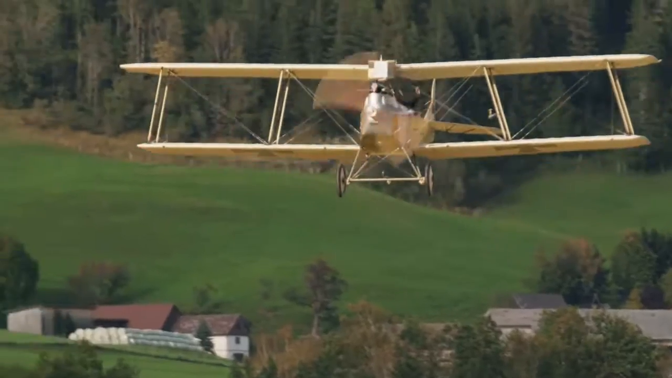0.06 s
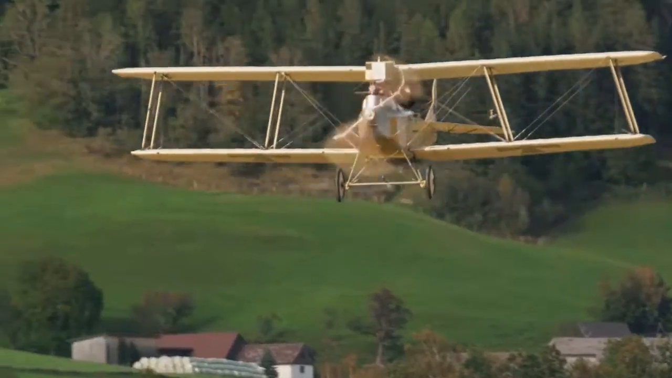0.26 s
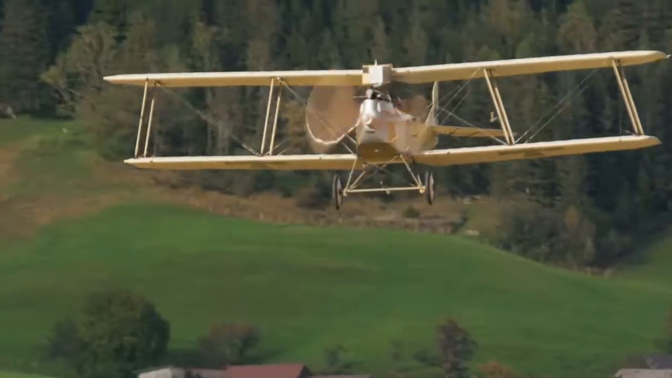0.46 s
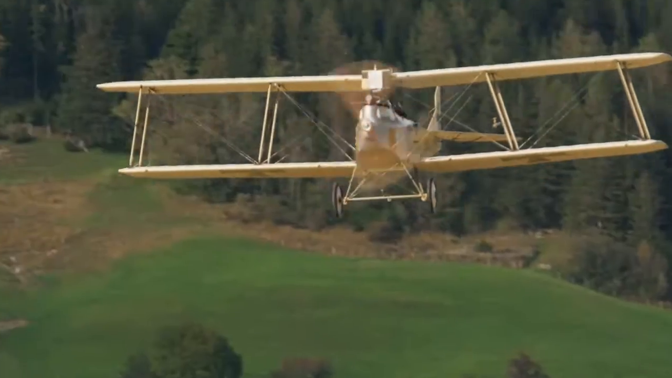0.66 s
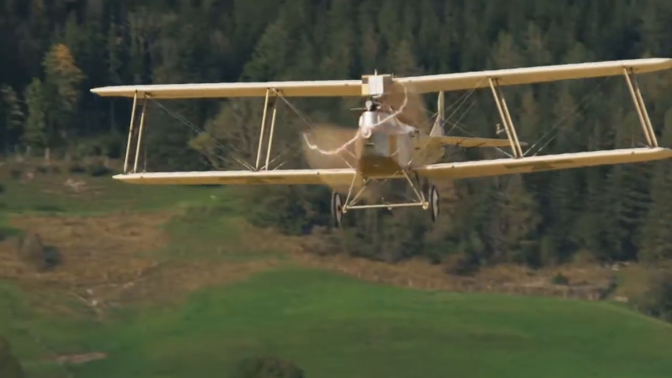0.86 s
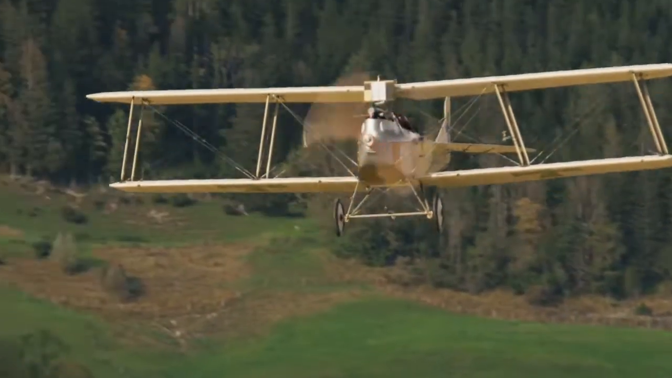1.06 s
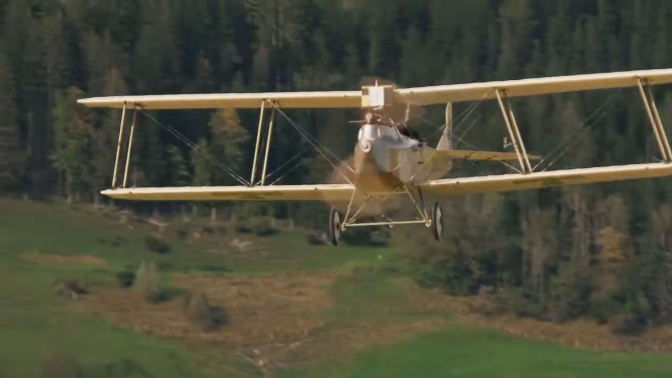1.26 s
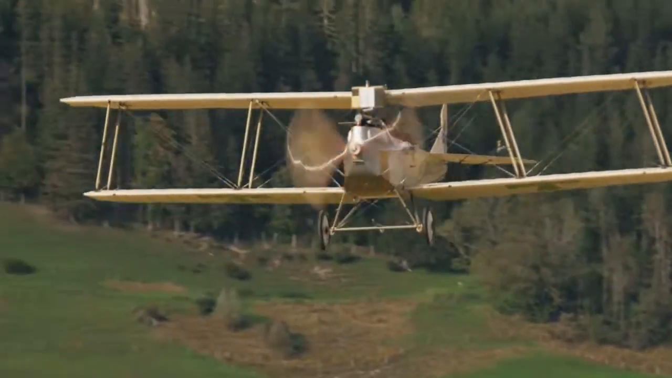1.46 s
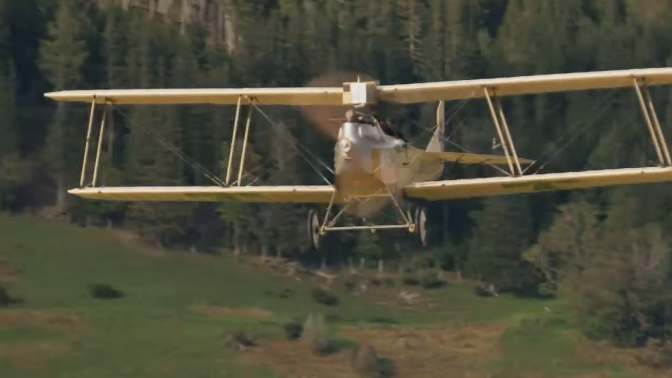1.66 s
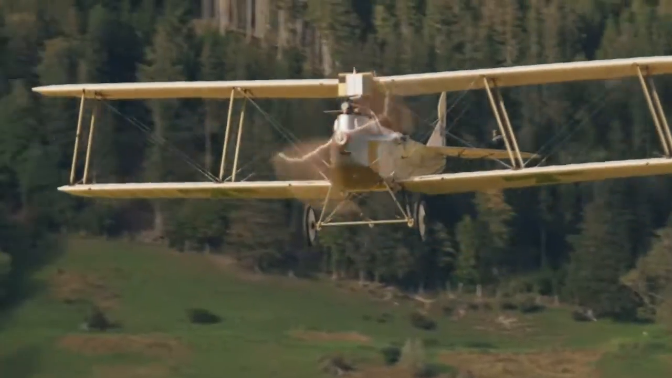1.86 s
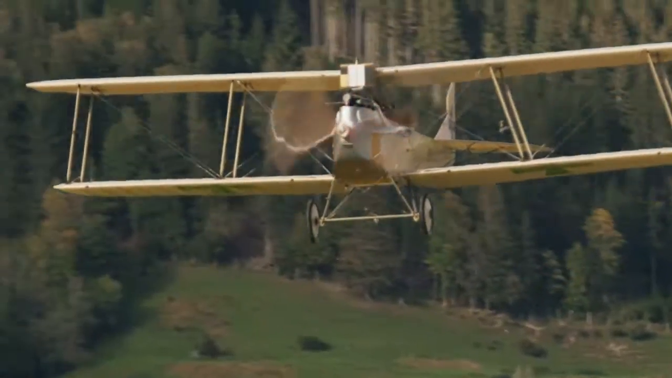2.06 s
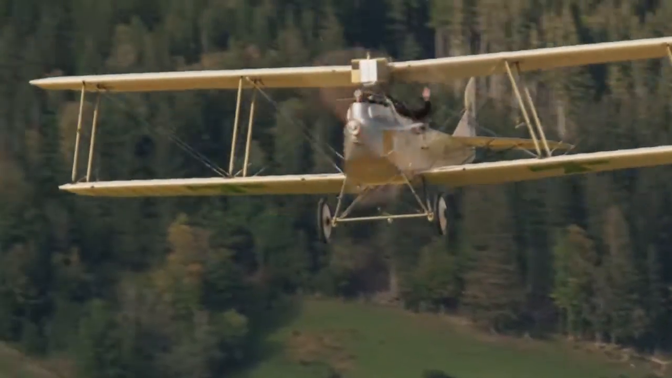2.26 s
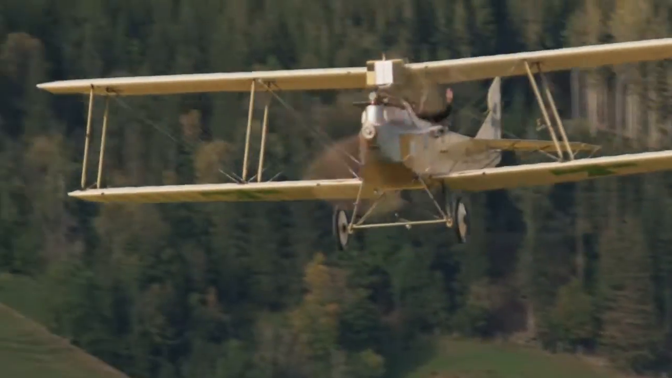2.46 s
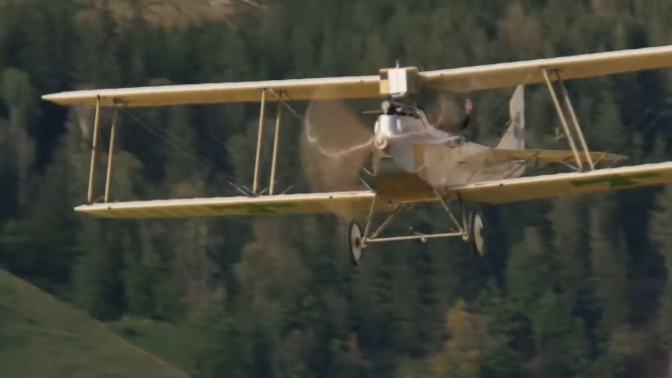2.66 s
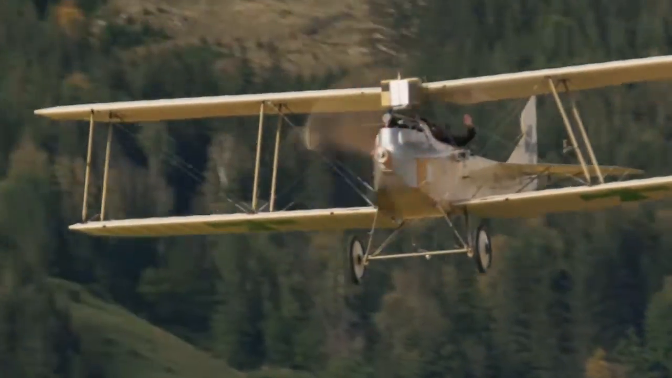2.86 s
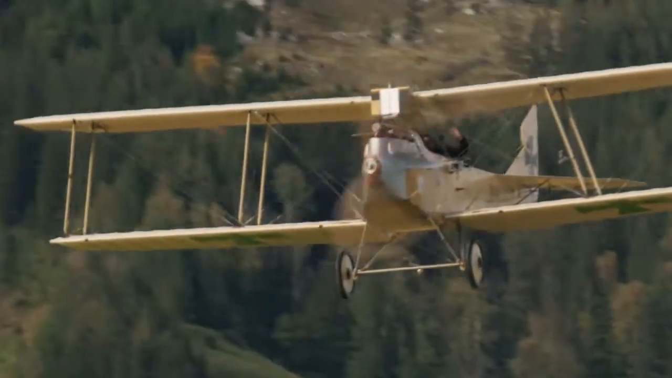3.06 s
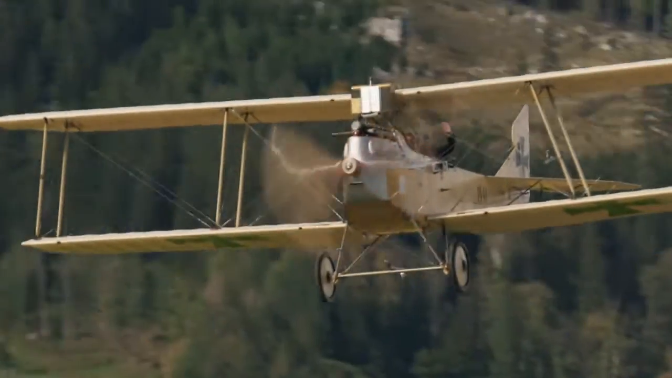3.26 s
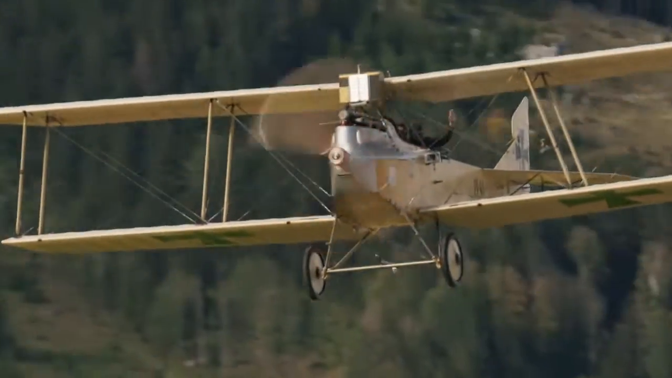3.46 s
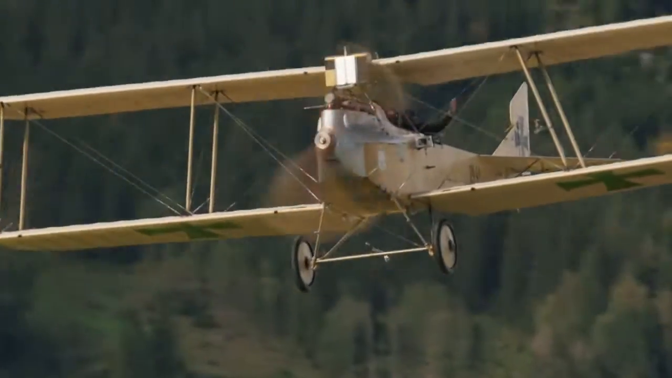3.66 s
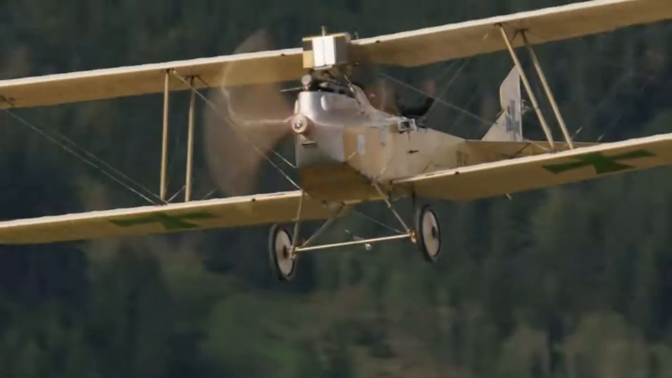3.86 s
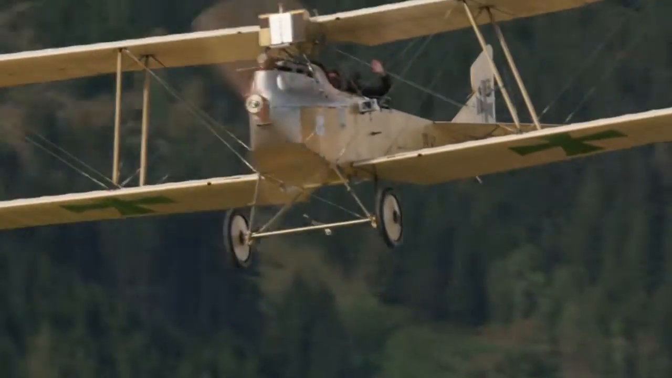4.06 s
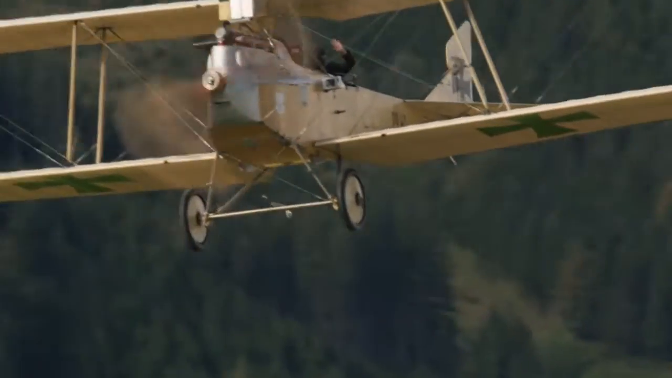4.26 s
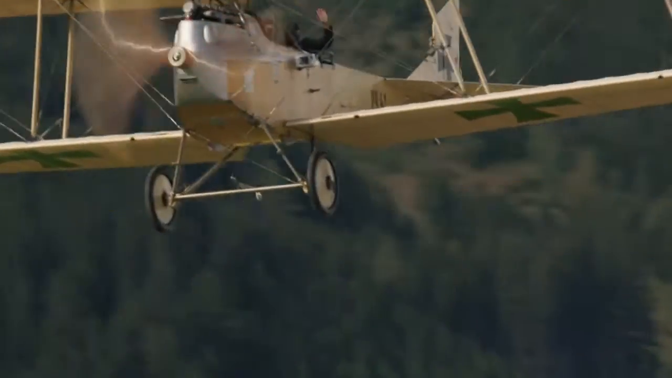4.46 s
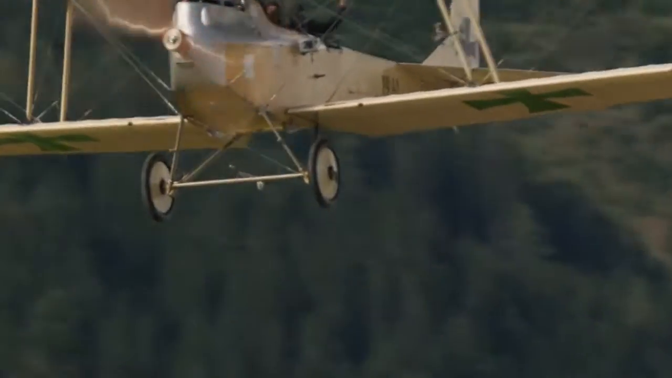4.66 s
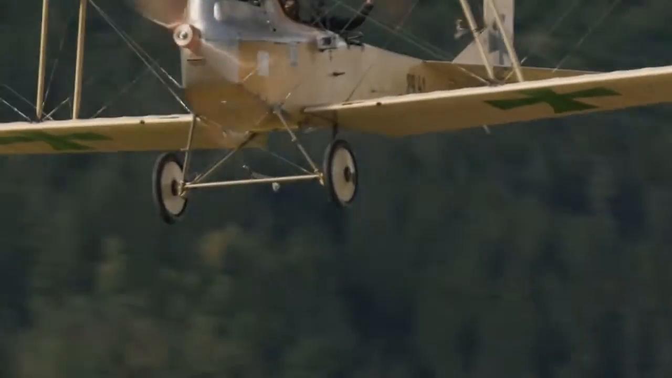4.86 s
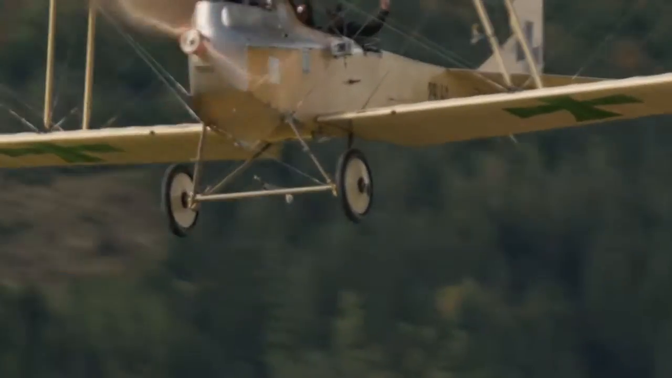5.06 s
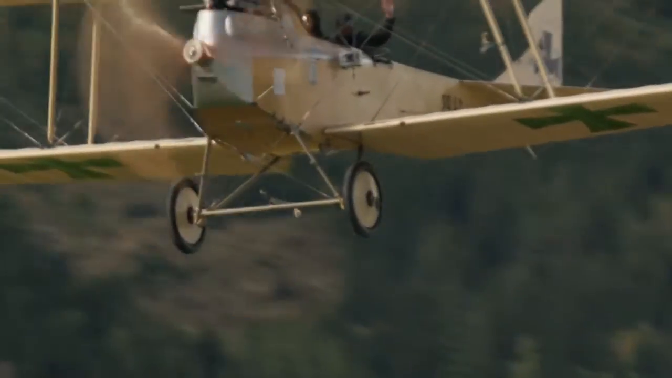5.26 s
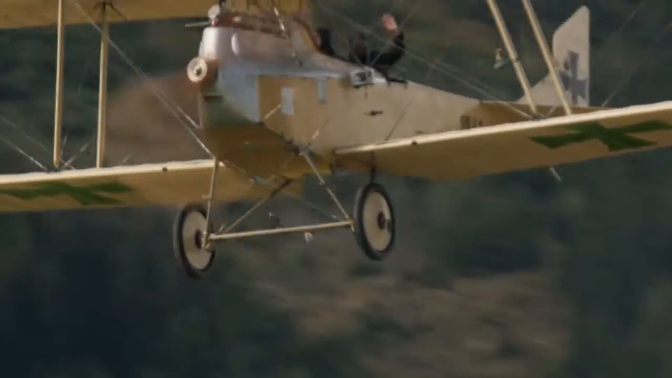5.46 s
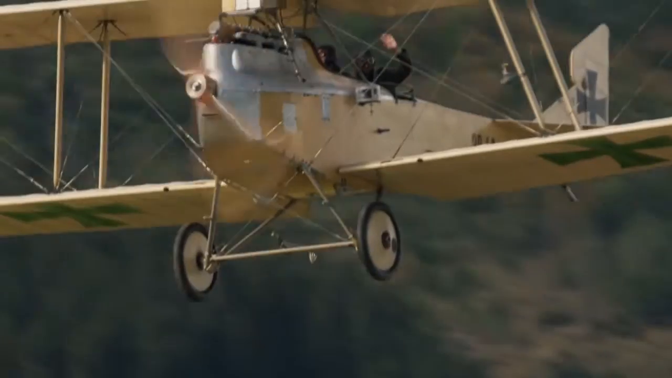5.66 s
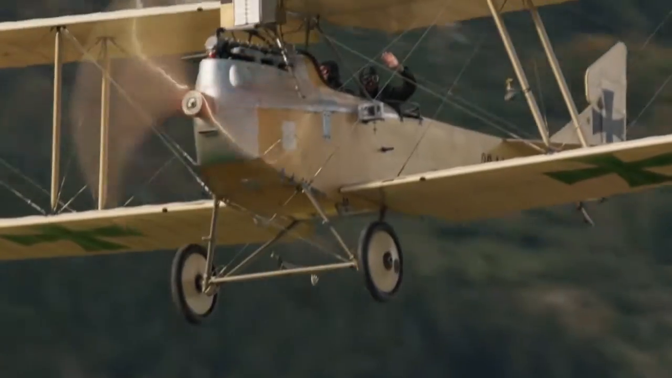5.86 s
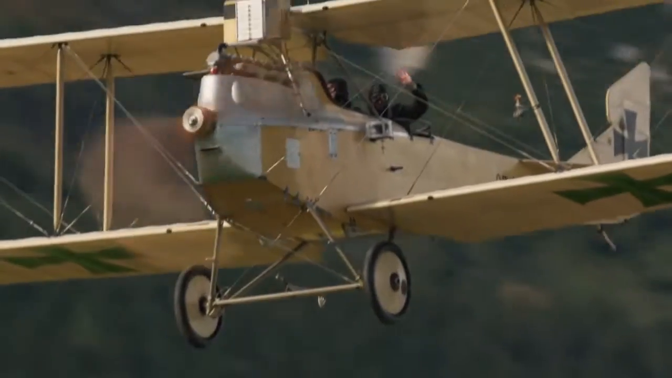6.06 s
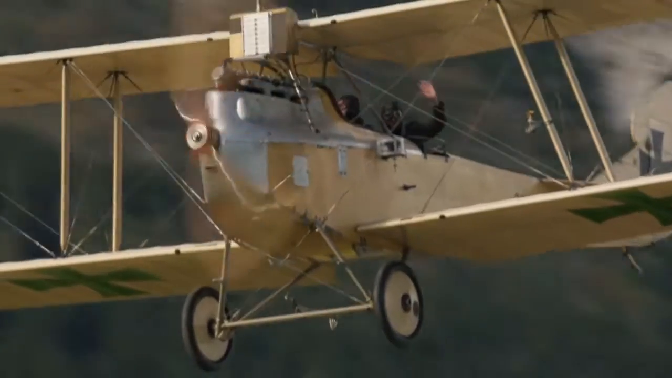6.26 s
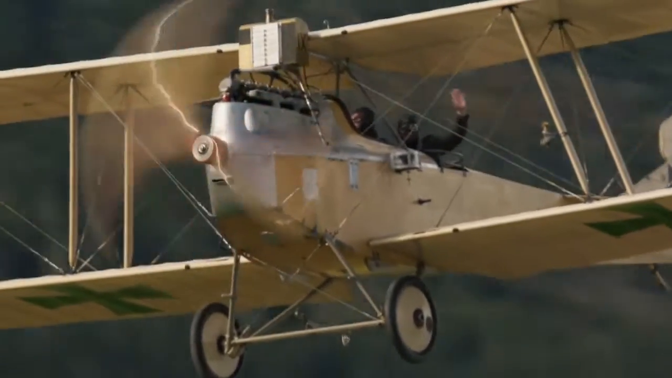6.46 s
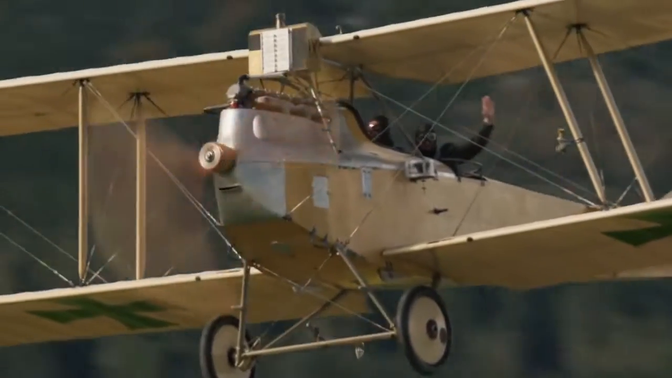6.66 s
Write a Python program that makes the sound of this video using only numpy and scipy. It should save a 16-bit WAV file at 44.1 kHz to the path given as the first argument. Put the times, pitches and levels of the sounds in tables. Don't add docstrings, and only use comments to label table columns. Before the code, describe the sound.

An old biplane's slow piston engine approaches over a quiet meadow, its low throbbing boom growing louder and rougher until sharp backfires crack close by.

```python
import sys
import numpy as np
from scipy import signal
from scipy.fft import rfft, irfft
from scipy.io import wavfile
from scipy.ndimage import uniform_filter1d

SR = 44100
rng = np.random.default_rng(int(sys.argv[2]) if len(sys.argv) > 2 else 0)


def boost_factor(decibels):
    exponent = np.asarray(decibels, float) / 20
    return 10 ** exponent


def unload_audio(sound):
    columns = np.transpose(np.atleast_2d(sound))
    steps = np.round(np.clip(columns, -1, 1) * 32767)
    wavfile.write(sys.argv[1], SR, steps.astype(np.int16))


N = 296352
TIME = np.arange(N) / SR
CYCLE_HZ = 11.9

# place of the boom in the cycle [0-1], place of the crack [0-1],
# boom in dB, stub resonance in Hz, its width in Hz, overtone in dB, crack in dB.
CYLINDERS = [
    (0.081, 0.111, -10.6, 95.0, 8.4, -13.9, -8),
    (0.218, 0.255, -23.5, 63.2, 15.6, 8.0, -3.5),
    (0.394, 0.431, -9.8, 90.3, 14.3, -13.9, -8),
    (0.562, 0.578, -17.7, 112.9, 31.9, 2.8, 0),
    (0.742, 0.771, -15.6, 100.9, 37.5, -21.3, -5),
    (0.908, 0.931, -14.7, 107.7, 33.2, 1.8, -5.5),
]
# time in seconds, peak in dB, ring in Hz, sharp edge in dB.
BACKFIRES = [(0.38, -33, 1620, -27), (0.719, -29, 1230, -8), (1.391, -27, 890, -26),
             (2.398, -27, 1890, -23), (2.482, -20, 2400, -21), (2.896, -20, 2410, -13),
             (3.229, -23, 1800, -7), (3.482, -13.5, 1170, -36.5), (3.648, -14, 1100, -32),
             (3.731, -22.5, 999, -24), (3.787, -19.5, 1870, -25), (4.149, -15.5, 1880, -19),
             (4.208, -12, 1460, -11.5), (4.57, -9, 1530, -30), (4.712, -8, 1040, -28),
             (4.853, -13.5, 1110, -11), (4.906, -7, 1080, -16.5), (4.988, -13.5, 1280, -28.5),
             (5.158, -17, 744, -11), (5.214, -12, 935, -23), (5.242, -8, 905, -17),
             (5.298, -10.5, 982, -14.5), (5.383, -9.5, 1130, -12.5), (5.58, -12.5, 860, -10.5),
             (5.664, -4.5, 1270, -16), (5.749, -11.5, 746, -14), (6.007, -11.5, 874, -16),
             (6.093, -9.5, 1000, -3.5), (6.349, -13, 706, -14), (6.519, -9.5, 1540, -6)]


def level(x, db):
    return x * boost_factor(db) / np.sqrt(np.mean(x ** 2))


def ring(x, hz, width):
    return signal.lfilter(*signal.iirpeak(hz, hz / width, SR), x)


def band(x, hz, width):
    edges_hz = [hz - width / 2, hz + width / 2]
    return signal.sosfilt(signal.butter(3, edges_hz, "band", fs=SR, output="sos"), x)


def walk(rate):
    k = int(SR / rate)
    held = np.repeat(rng.standard_normal(N // k + 1), k)
    return uniform_filter1d(uniform_filter1d(held, k), k)[:N]


def curves(table):
    s, *columns = np.transpose(table)
    return [np.interp(TIME, s, c) for c in columns]


def clicks(seconds, size, count):
    out = np.zeros(count)
    at = (seconds * SR).astype(int)
    inside = at < count
    np.add.at(out, at[inside], size[inside])
    return out


def meadow_air(noise):
    return level(band(noise, 3100.0, 2200.0), -81)


def hillside(x):
    # start in seconds, end in seconds, first cancelled Hz at the start,
    # the same at the end, echo strength [0-1].
    slopes = [
        (0, .8, 742, 1000, 0.2),
        (.4, 1.04, 1620, 2000, 0.38),
        (1.001, 1.7, 1590, 1770, 0.47),
        (1.75, 2.8, 780, 1370, 0.2),
        (4.4, 7.99, 2140, 750, .7),
    ]
    dull = signal.filtfilt(*signal.butter(2, 2800, fs=SR), x)
    out = x
    for start, end, from_hz, to_hz, share in slopes:
        way = np.clip((TIME - start) / (end - start), 0, 1)
        delay = 1 / (from_hz + (to_hz - from_hz) * way)
        out = out - min(share, 0.9) * np.sin(np.pi * way) * np.interp(TIME - delay, TIME, dull)
    return out


def hum(cycles, order, start_s, loudest_s, db, rise_db, fall_db):
    before, after = np.maximum(loudest_s - TIME, 0), np.maximum(TIME - loudest_s, 0)
    gain = boost_factor(db - rise_db * before - fall_db * after + 2.4 * walk(14.0))
    fade_in = np.clip((TIME - start_s) / 0.12, 0, 1)
    return gain * fade_in * np.sin(2 * np.pi * order * cycles + 0.5 * walk(11.0))


def valve_gear(cycles):
    low = hum(cycles, 32, start_s=1.35, loudest_s=4.6, db=-37, rise_db=3.2, fall_db=14)
    high = hum(cycles, 39, start_s=5.6, loudest_s=6.5, db=-39, rise_db=3, fall_db=0)
    deep = hum(cycles, 26, start_s=3.2, loudest_s=5.2, db=-37, rise_db=5, fall_db=12)
    return low + high + deep


def gas(source, bands, patchy_db, loss=0):
    spectrum = rfft(source)
    hz_axis = np.arange(N // 2 + 1) * SR / N + 1e-9
    out = 0
    for hz, db in bands:
        octaves = np.log2(hz_axis / hz)
        hump = np.cos(np.pi / 2 * np.clip(octaves / 0.48, -1, 1)) ** 2
        flicker = boost_factor(patchy_db * walk(6.0) - loss * np.log2(hz / 2000))
        out = out + level(irfft(spectrum * hump, N), db) * flicker
    return out


def exhaust_gas(jet_noise, growl_noise, puff, wash, near_db, bark_db, bright_db):
    # centre in Hz, level in dB.
    growl_bands = [(330, -7), (440, -12), (590, -10.5)]
    bark_bands = [(820, -12.5), (1150, -12), (1500, -12)]
    spit_bands = [(1950, -8.5), (2700, -12.5), (3700, -18), (5100, -23), (7000, -34), (9600, -44)]
    # time in seconds, loss in dB per octave.
    air_loss = [(.7, 6), (1.4, 4.5), (2.4, 6), (3.8, 6), (4.2, 3), (4.5, 3.5), (4.9, 0.5), (6.72, -6.5)]
    far_db = -23
    growl_db = np.minimum(-31 + 2.5 * (near_db - far_db), -19)
    jet = jet_noise * (puff + wash)
    rough = growl_noise * (puff + boost_factor(4.0)) + 0.6 * jet
    growl = gas(rough, growl_bands, 0.4) * boost_factor(growl_db)
    bark = gas(jet, bark_bands, 0.95) * boost_factor(bark_db)
    spit = gas(jet, spit_bands, 1.1, curves(air_loss)[0]) * boost_factor(bark_db + bright_db)
    return growl, bark + spit


def pops(cycles, near_db, gas_db, bright_db):
    places, crack_db = np.array(CYLINDERS)[:, [1, -1]].T
    firings = (np.arange(int(cycles[-1]) + 1)[:, None] + places).ravel()
    s = np.interp(firings, cycles, TIME, left=-1, right=-1)
    chance = rng.standard_normal((len(s), 3))
    near, carried, bright = [np.interp(s, TIME, c) for c in (near_db, gas_db, bright_db)]
    db = 12 + np.resize(crack_db, len(s)) + near + 1.16 * carried + 0.25 * bright
    db = db - 5 * np.abs(chance[:, 0])
    hz = 2150 * 2 ** (bright / 13.5 + 0.38 * np.tanh(chance[:, 1]))
    edge_db = -20 + 6.0 * chance[:, 2]
    gap_s = np.abs(s[:, None] - np.array(BACKFIRES)[:, 0]).min(axis=1)
    return np.transpose([s, db, hz, edge_db])[(s > 0) & (gap_s > 0.007)]


def backfires(cracks):
    out, t = np.zeros(N + 400), TIME[:400]
    chance = rng.standard_normal((len(cracks), 800))
    hiss = level(band(chance, 2100.0, 1400.0), -5.0)[:, 400:]
    sharp = level(band(chance, 3780.0, 2000.0), 0)[:, 400:]
    shape = (t / 0.0011) ** 2 * np.exp(2 - 2 * t / 0.001)
    for (s, db, hz, edge_db), body, edge in zip(cracks, hiss, sharp):
        tone = -np.cos(2 * np.pi * hz * (t - 0.001))
        at = int(max(s - 0.0001, 0) * SR)
        out[at:at + 400] += boost_factor(db - 8.0) * shape * (tone + body + boost_factor(edge_db) * edge)
    return out[:N]


def crank_turns():
    # start in seconds, engine cycles per second.
    speed_steps = [(0, 11.88), (0.6, 11.83), (1.0, 11.919), (2.6, 12.025), (3.6, 11.945), (4.2, 11.904),
                   (5.4, 11.785), (5.6, 11.715), (6.0, 11.668)]
    since, speed = np.transpose(speed_steps)
    held = speed[np.searchsorted(since, TIME, "right") - 1]
    return 3.054 + np.cumsum(uniform_filter1d(held, SR // 10)) / SR


def engine(cycles):
    scatter_db, jitter_s, crack_scatter_db = 1.0, 0.000078, 2.6
    turns = np.arange(int(cycles[-1]) + 2)
    count = int(len(turns) / CYCLE_HZ * SR)
    chance = rng.standard_normal((len(turns), len(CYLINDERS), 3))
    boom, puff = 0, 0
    for j, (place, crack, boom_db, hz, width, over_db, crack_db) in enumerate(CYLINDERS):
        late = jitter_s * chance[:, j, 0]
        push_size = boost_factor(boom_db + scatter_db * chance[:, j, 1])
        push = clicks((turns + place) / CYCLE_HZ + late, push_size, count)
        overtone = boost_factor(over_db) * ring(push, 2.2266 * hz, 10.2)
        shared_pipe = boost_factor(2.5) * ring(push, 256.45, 7.5)
        boom = boom + ring(push, hz, width) - overtone - shared_pipe
        crack_size = boost_factor(crack_db + crack_scatter_db * np.minimum(chance[:, j, 2], 1))
        puff = puff + clicks((turns + crack) / CYCLE_HZ + late, crack_size, count)
    w = 2 * np.pi * 55.3
    for _ in range(2):
        boom = signal.lfilter(*signal.bilinear([1, 0, 0], [1, w, w * w], SR), boom)
    boom = signal.sosfiltfilt(signal.butter(4, 420, fs=SR, output="sos"), boom)
    boom = boom + 0.77 * np.roll(boom, int(0.0017 * SR))
    t = TIME[:600]
    puff = signal.fftconvolve(puff, (1 - np.exp(-t / 0.00041)) * np.exp(-t / 0.0027))[:count]
    at = cycles / CYCLE_HZ * SR
    heard_boom, heard_puff = [np.interp(at, np.arange(count), x) for x in (boom, puff)]
    return level(heard_boom, 0), level(heard_puff, 0)


def sideways_beam(boom):
    missing = np.interp(TIME, (0, 4.5), (0.45, 0))
    return boom - missing * signal.filtfilt(*signal.iirpeak(265, 2.5, SR), boom)


def microphones(low, high, apart, air, floor):
    off_centre = np.interp(TIME, (4.7, 5.7), (1, 0.15))
    side = boost_factor(-27.5) * off_centre * ring(low, 71.0, 39.0)
    side = side - boost_factor(-41.5) * ring(low, 260.0, 200.0) - boost_factor(-32.5) * ring(high, 4000.0, 6000.0)
    side = side + apart + air
    mid = low + high + floor
    return np.array([mid + side, mid - side])


def scene():
    # time in seconds, engine level in dB,
    # gas carried by the air in dB over the boom, brightness of the gas in dB.
    approach = [(0, -24, -21.5, -8), (.3, -23, -19, -4.5), (.7, -22.5, -21.5, 5.5), (1.1, -21.5, -22, -5.5),
                (1.4, -22, -16.5, -8), (1.6, -21.5, -19, -6.5), (2.1, -21, -21.5, -6),
                (2.4, -20.5, -18.5, 0.5), (3.0, -20, -16.5, 0), (3.4, -19.5, -14, -3.5),
                (3.8, -19, -17, -3), (4.15, -18, -16, -3.5), (4.6, -16.5, -10, -11),
                (5.2, -15.5, -12, -8.5), (5.8, -15.7, -15.5, -7.5), (6.1, -15.5, -15.5, -10),
                (6.72, -14, -12.5, -13.5)]
    near_db, bark_db, bright_db = curves(approach)
    cycles = crank_turns()
    boom, puff = engine(cycles)
    noise = rng.standard_normal((4, N))
    wash = boost_factor(np.interp(TIME, (1.5, 6.0), (-5.5, -1.0)))

    growl, sharp_gas = exhaust_gas(noise[0], noise[1], puff, wash, near_db, bark_db, bright_db)
    small_cracks = backfires(pops(cycles, near_db, bark_db, bright_db))
    cracks = (backfires(BACKFIRES) + small_cracks) / boost_factor(near_db)
    high = (growl + hillside(sharp_gas + cracks)) * boost_factor(near_db) + valve_gear(cycles)

    rumble = level(band(noise[2], 144.3, 162.0), -12) + level(band(noise[2], 33.0, 18.0), -41.5)
    low = (sideways_beam(boom) + rumble) * boost_factor(near_db)

    apart = level(band(noise[3] * (puff + wash), 1500.0, 2900.0), -14.0) * boost_factor(3.15 * near_db)
    return microphones(low, high, apart, meadow_air(noise[3]), level(noise[1], -85.0))


def roll_off(x):
    return signal.sosfilt(signal.butter(12, 15700, fs=SR, output="sos"), x)


def record(dry):
    return roll_off(dry)


dry = scene()
out = record(dry)
unload_audio(out)
```